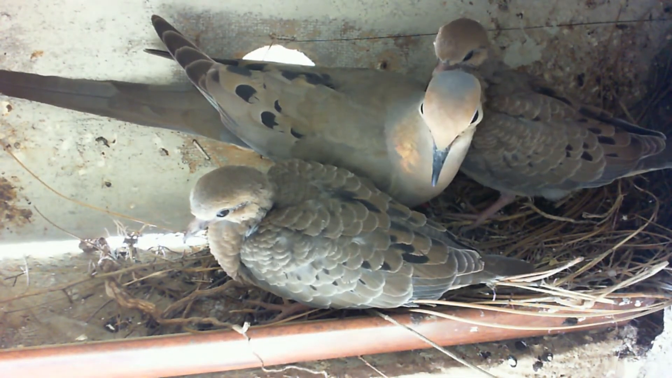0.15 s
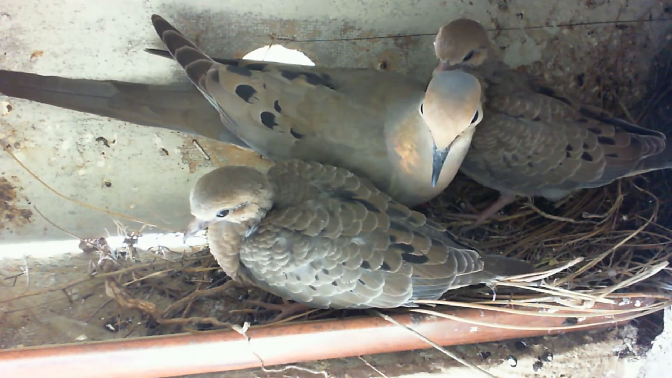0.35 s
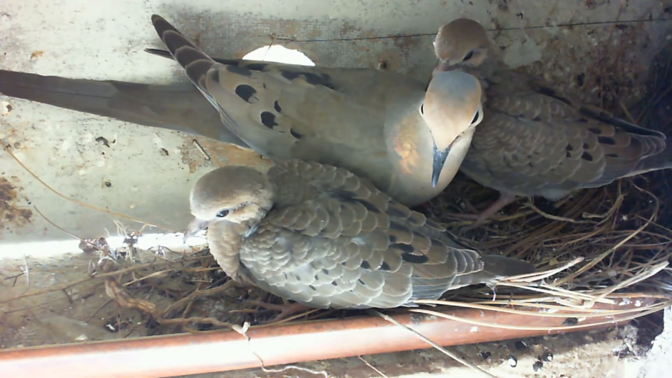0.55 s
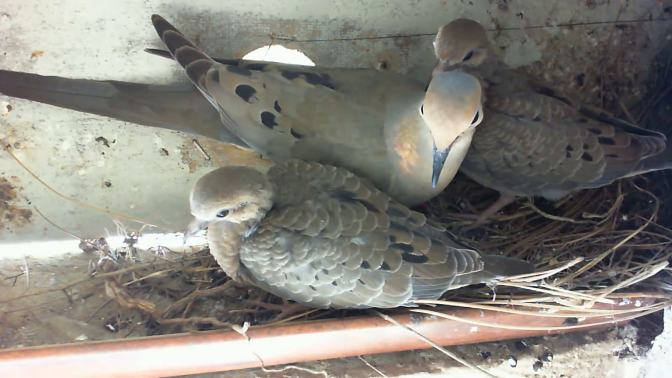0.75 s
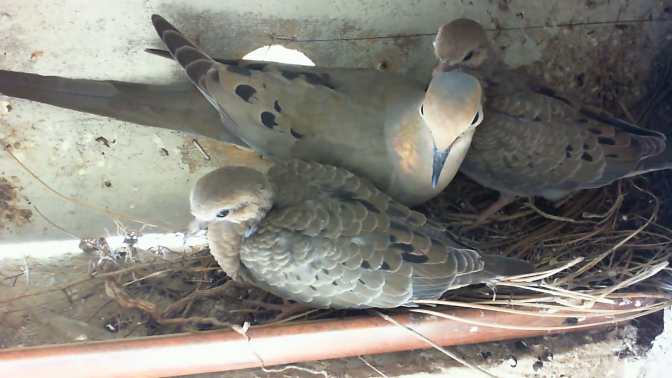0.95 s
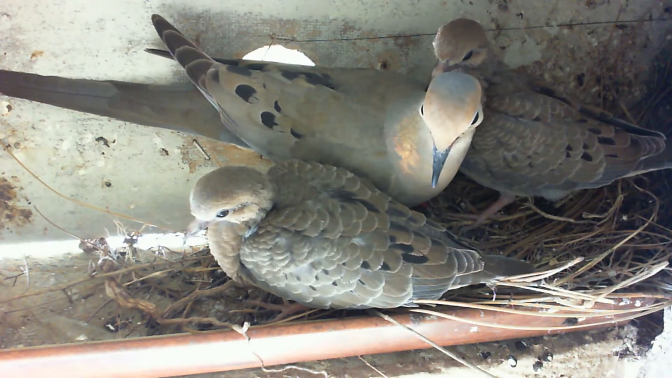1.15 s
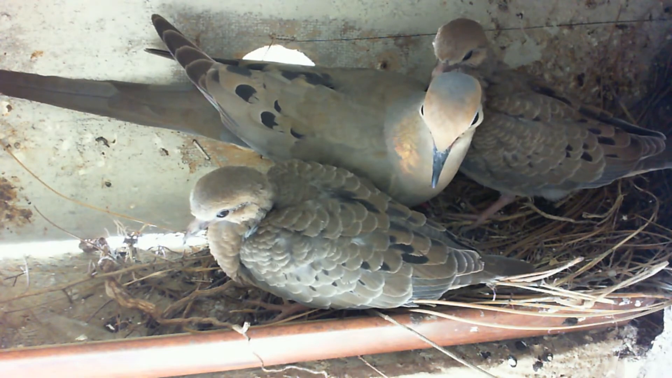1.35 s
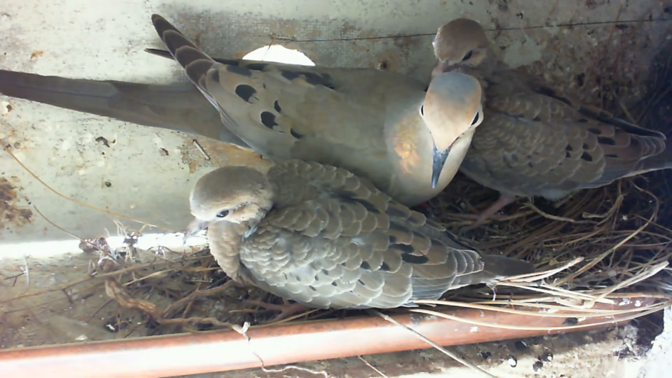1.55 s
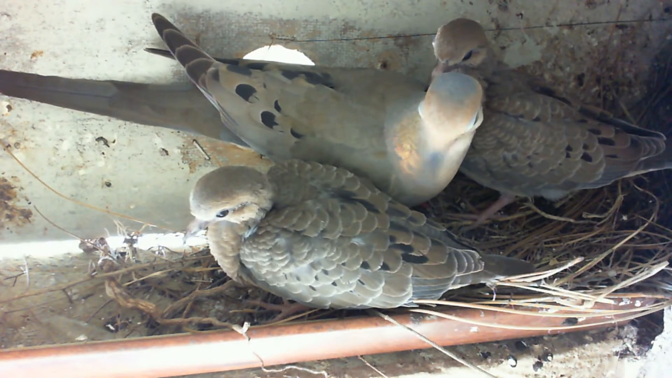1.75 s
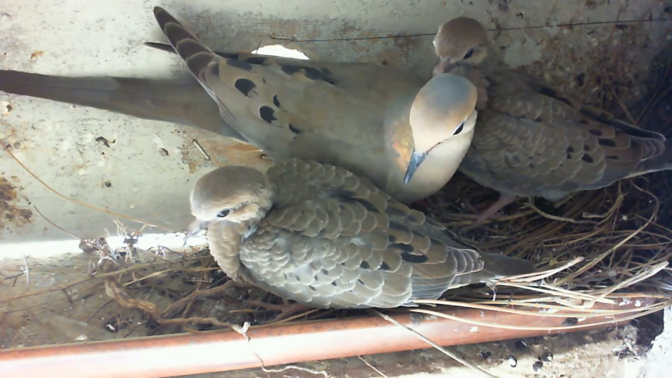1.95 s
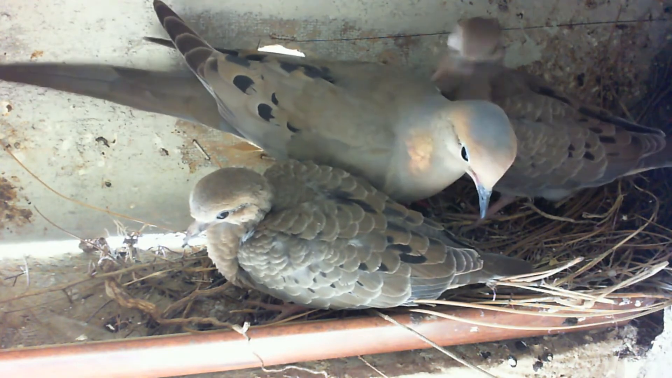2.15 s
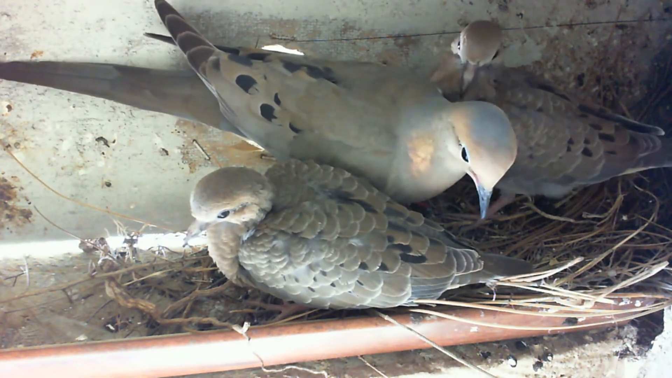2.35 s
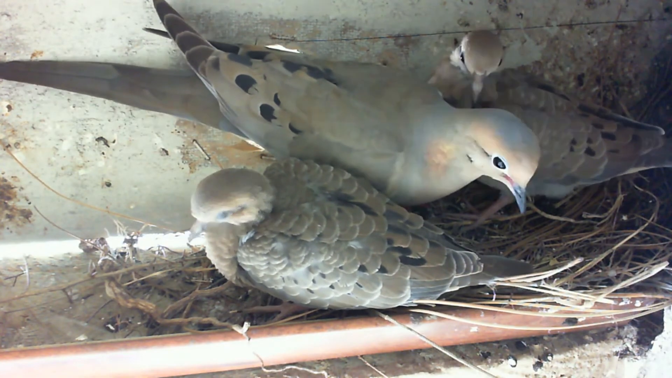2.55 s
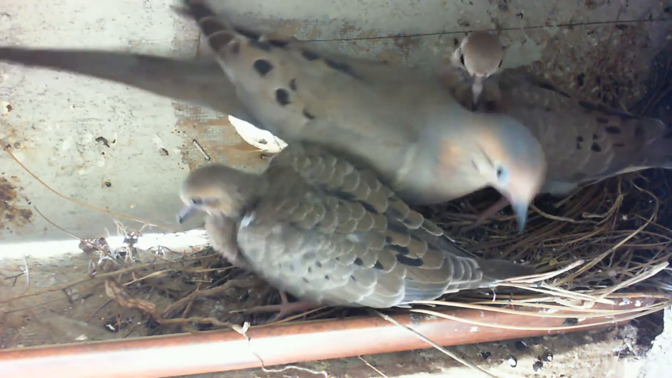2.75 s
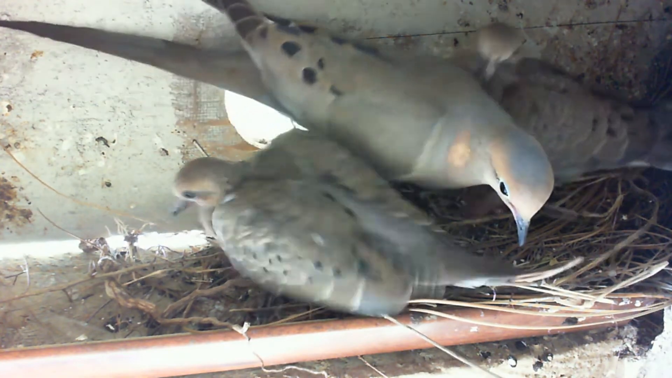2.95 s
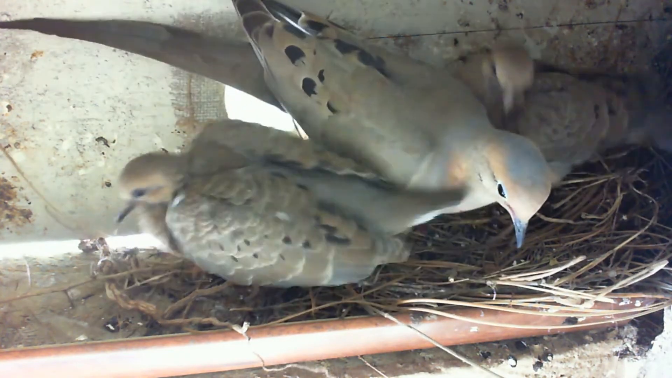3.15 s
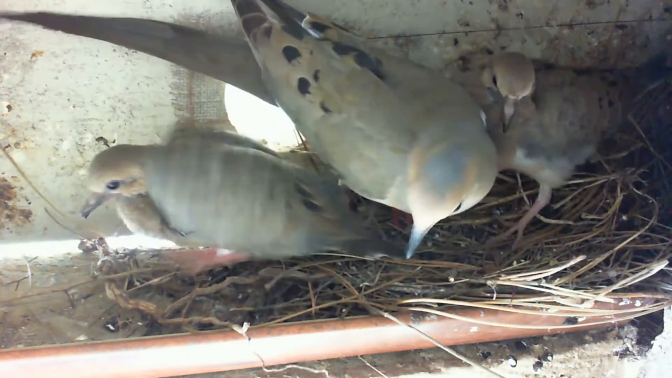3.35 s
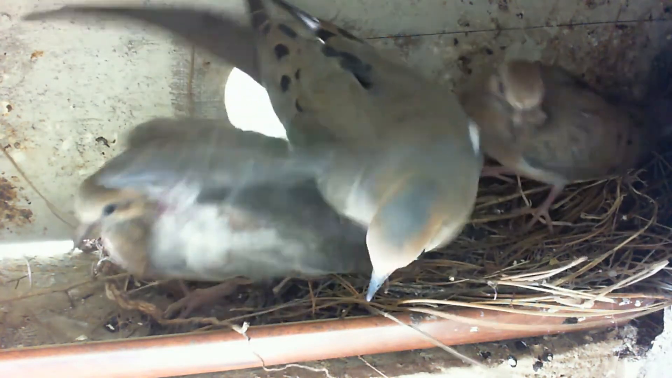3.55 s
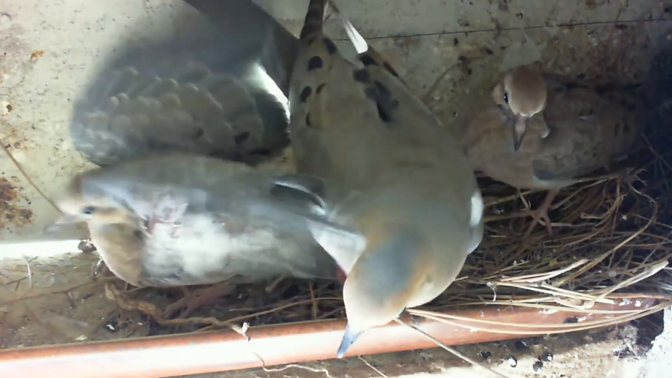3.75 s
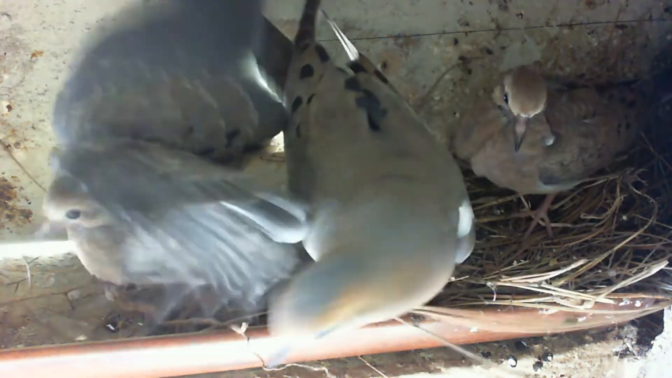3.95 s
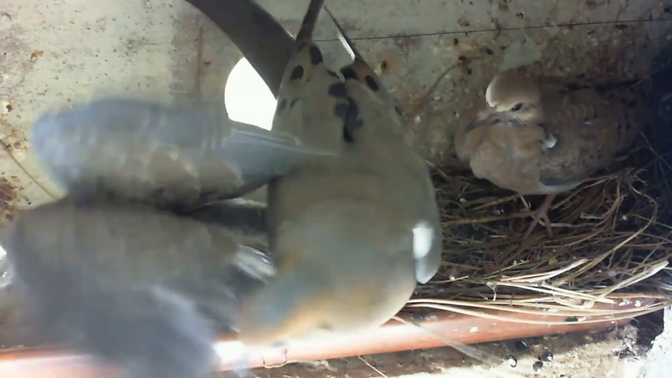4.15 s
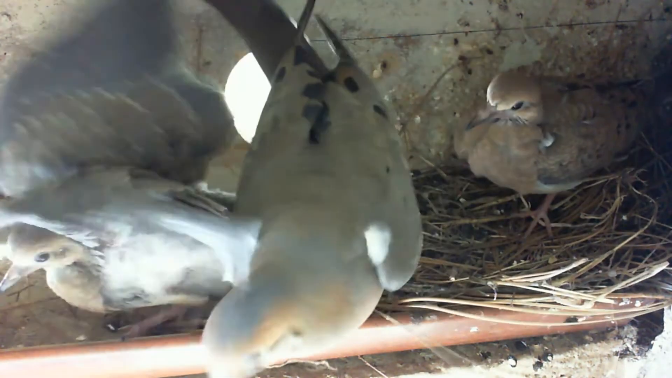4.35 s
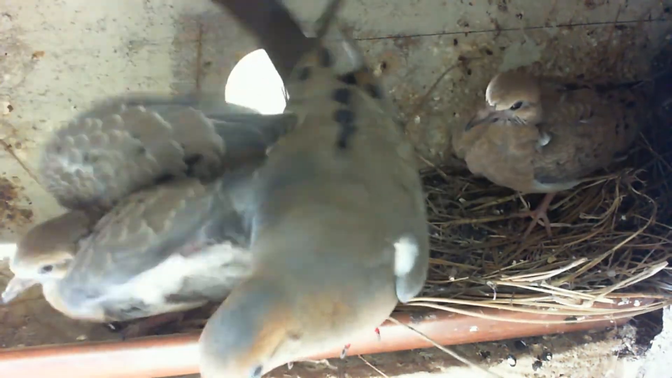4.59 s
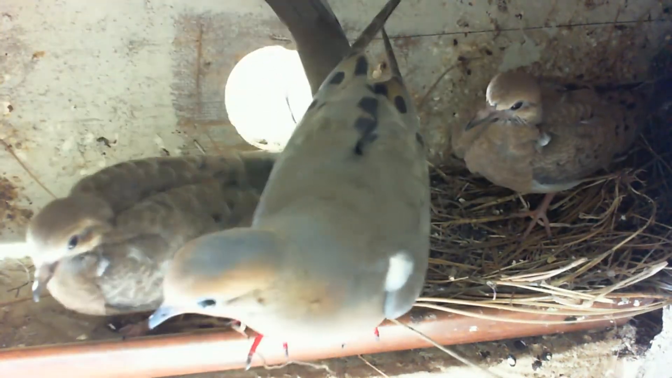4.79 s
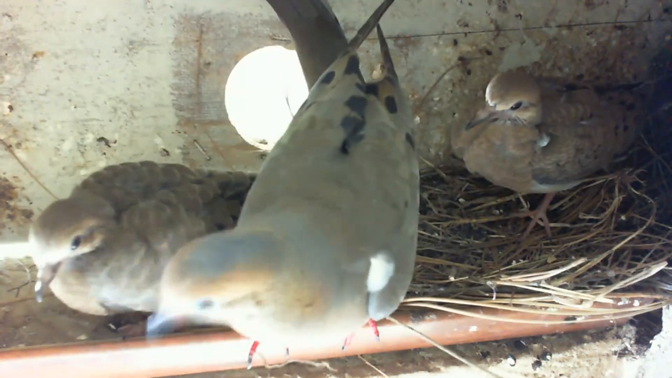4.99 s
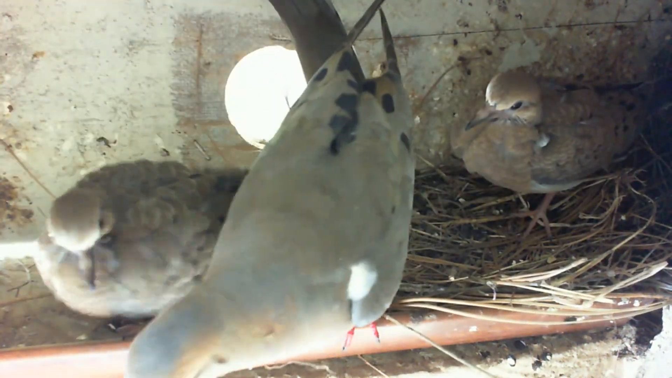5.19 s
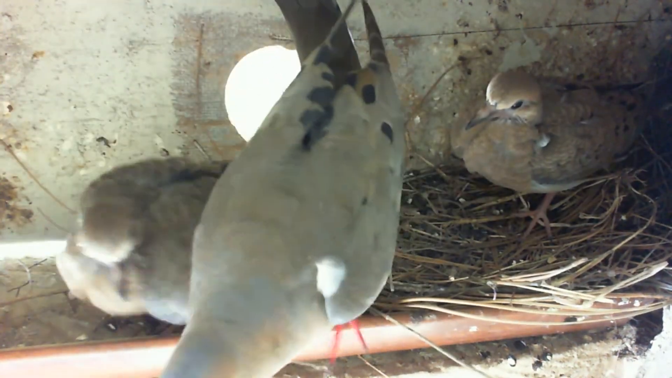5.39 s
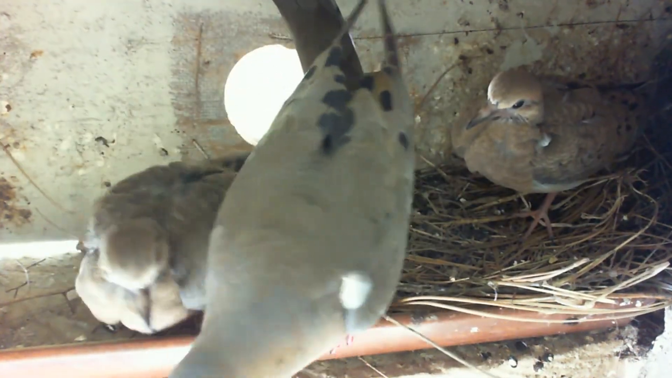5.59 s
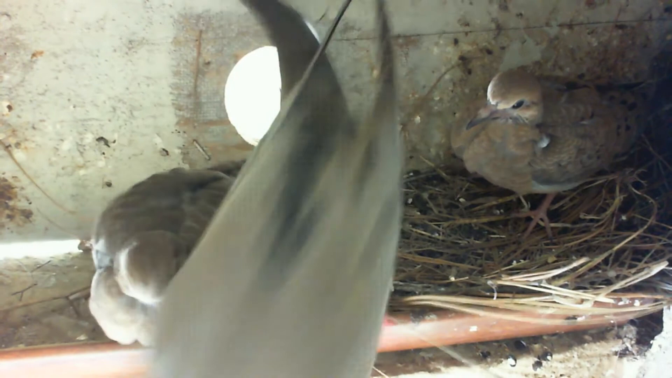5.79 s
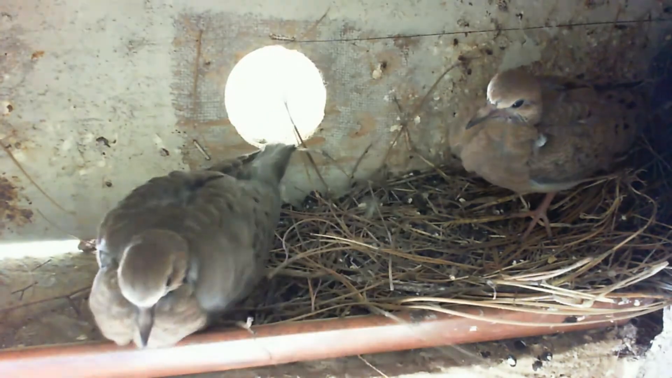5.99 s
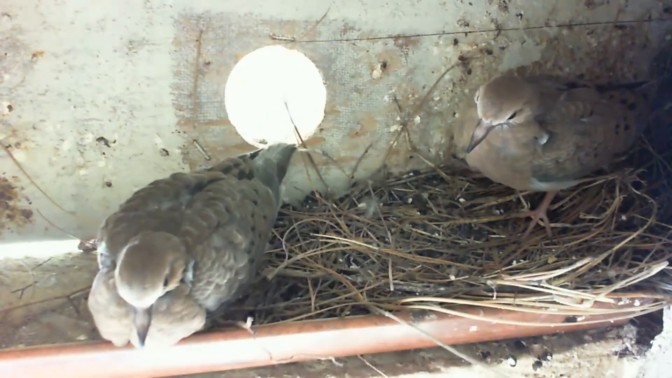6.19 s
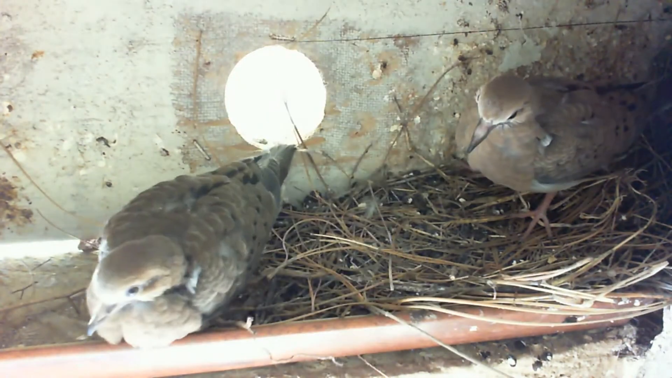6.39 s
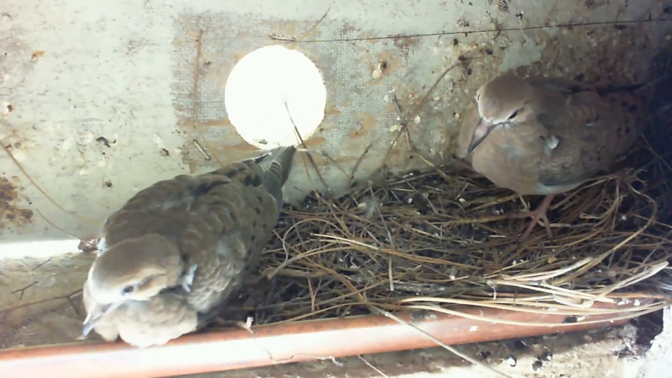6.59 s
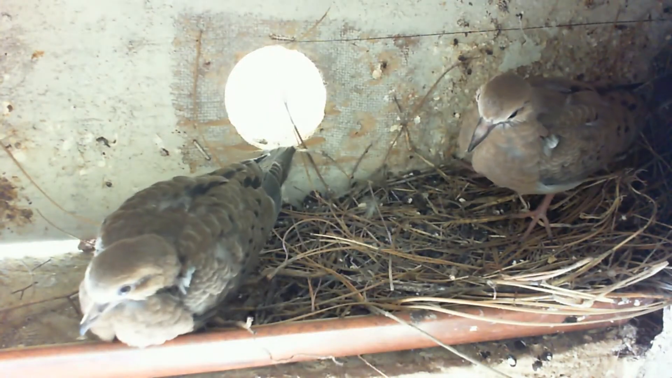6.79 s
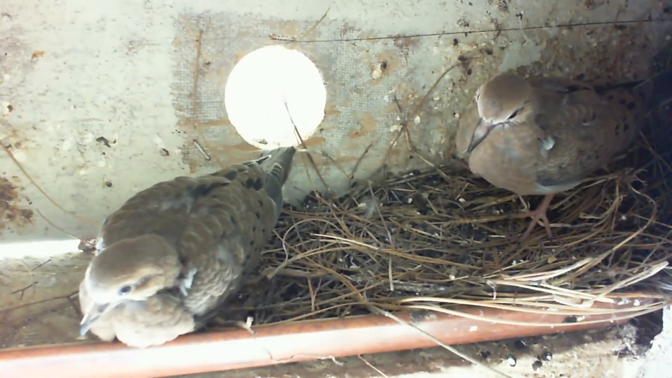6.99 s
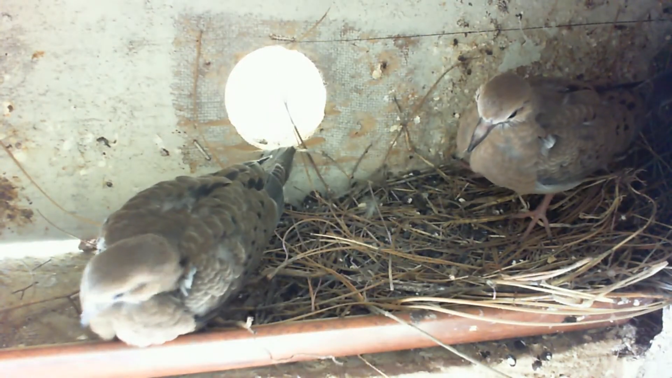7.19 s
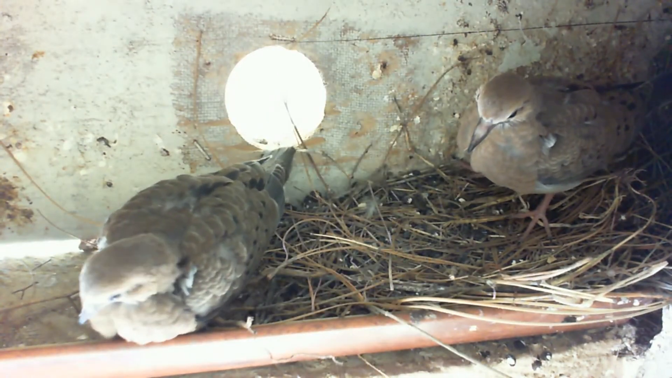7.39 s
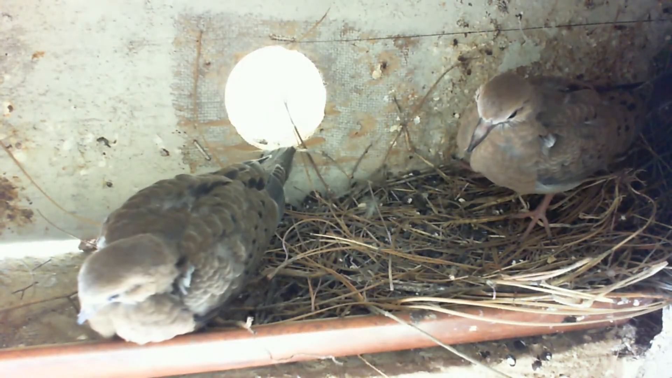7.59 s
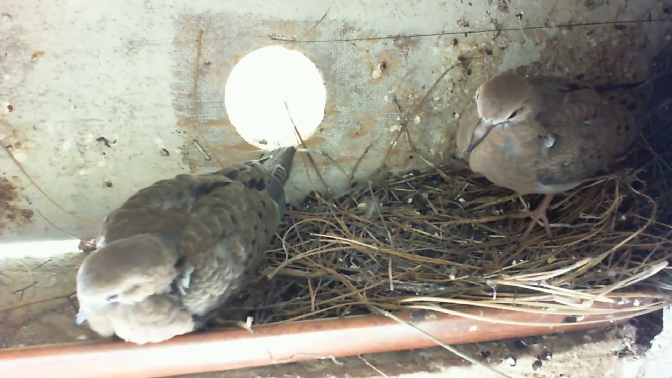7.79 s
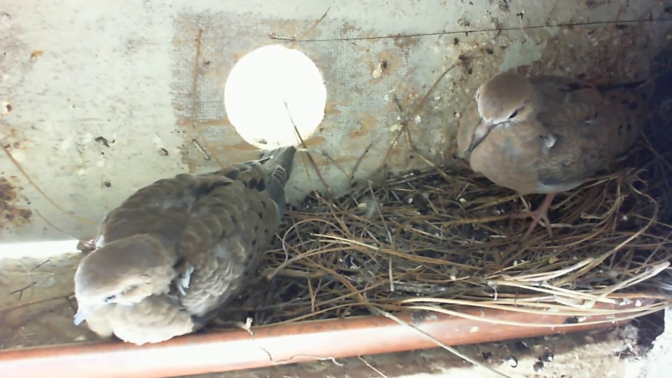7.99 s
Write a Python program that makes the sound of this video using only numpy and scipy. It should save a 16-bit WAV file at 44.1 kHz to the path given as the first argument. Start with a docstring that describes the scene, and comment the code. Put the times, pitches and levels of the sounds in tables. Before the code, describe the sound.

Fledgling doves cheep in thin rising whistles amid gritty rustles and snapping twigs, then the parent bursts away on whistling wingbeats over faint traffic.

```python
"""Far traffic drones throughout as shaped noise and gliding notes, with a thin whine and hiss from the preamp.
A dull tap rings the box and a far songbird chips; then two fledglings cheep in gliding whistles between
gritty rustles on dry twigs, snapping twigs and claw taps. At last the parent dove leaps from the nest box, its
wing feathers whistling on each downstroke as fluttering tones and rushing air that fade away, while the
draught buffets the microphone in low puffs and jolts; the songbird chips once more near the end."""
import sys
import numpy as np
from scipy import signal
from scipy.fft import rfft, irfft, next_fast_len
from scipy.io import wavfile
from scipy.ndimage import uniform_filter1d, map_coordinates

SR = 44100
rng = np.random.default_rng(int(sys.argv[2]) if len(sys.argv) > 2 else 0)


def store_wav(level_fs):
    """Save 16-bit WAV to argv[1]."""
    pcm = np.round(np.clip(np.atleast_2d(level_fs), -1, 1) * 32767)
    wavfile.write(sys.argv[1], SR, pcm.T.astype(np.int16))


N = 354299
TIME = np.arange(N) / SR


def amp(db):
    """Turn decibels into a plain multiplier."""
    return 10 ** (np.asarray(db) / 20)


def unit(x):
    """Scale x to an average strength (rms) of 1."""
    return x / np.sqrt(np.mean(x ** 2) + 1e-20)


def curves(rows):
    """One value per sample for each column after the time."""
    s, *cols = np.transpose(rows)
    return [np.interp(TIME, s, c) for c in cols]


def window(start, length, rise, fall):
    """A straight rise from start to 1, then an exponential fall once length has passed (all in s)."""
    t = TIME - start
    return np.clip(t / rise, 0, 1) * np.exp(-np.clip(t - length, 0, None) / fall)


def wobble(rate):
    """A smooth random curve through rate random points a second."""
    points = rng.standard_normal(int(N * rate / SR) + 4)
    return map_coordinates(points, [TIME * rate])


def filtered(x, response):
    """Multiply the spectrum of x by a response that depends on frequency."""
    m = next_fast_len(len(x) + 8192)
    return irfft(rfft(x, m) * response(np.fft.rfftfreq(m, 1 / SR)), m)[:len(x)]


def coloured(x, points):
    """Shape the spectrum of x by (f/Hz, level/dB) points on a log axis, then set rms to 1."""
    f, db = np.transpose(points)
    return unit(filtered(x, lambda hz: amp(np.interp(np.log(hz + 1), np.log(f + 1), db))))


def resonances(modes):
    """Response of things that ring at (f/Hz, width/Hz, level/dB), with alternating signs."""
    def response(f):
        return sum((-1) ** k * amp(db) * 1j * f * width / (centre ** 2 - f ** 2 + 1j * f * width)
                   for k, (centre, width, db) in enumerate(modes))
    return response


def echoes(x, t60):
    """Spread x into a dying random tail that loses 60 dB in t60 seconds."""
    tail = rng.standard_normal(SR // 2) * amp(-60 * TIME[:SR // 2] / t60)
    return signal.fftconvolve(x, tail / np.linalg.norm(tail))[:N]


def grit(per_s, spread_db, share):
    """Noise with scattered sharp grains in it, rms 1."""
    strength = amp(spread_db * np.minimum(rng.exponential(size=N), 3.5))
    grains = (rng.random(N) < per_s / SR) * strength * rng.standard_normal(N)
    return unit(rng.standard_normal(N) + share * unit(grains))


# Far engine notes, one list each: t/s, f/Hz, level/dB
ENGINE_NOTES = [
    [(0, 128, -58), (1.1, 185, -67.5)],
    [(0, 188, -63.5), (1.4, 192, -59.5), (2.1, 190, -86)],
    [(4.8, 150, -66.5), (8.03, 140, -64)],
    [(4.2, 248, -65.5), (5.5, 246.5, -61.5), (6.6, 243, -76), (7, 241, -54), (8.03, 241, -58.5)],
]


def engine_note(rows):
    """A far engine gives a tone that holds or glides and wavers a little."""
    hz, db = curves(rows)
    start = rows[0][0] - .1
    gate = window(start, rows[-1][0] - start, .1, .1)
    phase = 2 * np.pi * np.cumsum(hz + 3 * wobble(15)) / SR
    return np.sqrt(2) * gate * amp(db + 2.26 * wobble(12)) * np.sin(phase)


# Slow swell of the traffic: t/s, tyre level/dB, engine level/dB
TRAFFIC_SWELL = [(0, -54.5, -57), (.7, -55.5, -55.5), (1.15, -51, -56.5), (1.55, -54, -57),
                 (1.9, -57.5, -57), (4.5, -56, -55), (8.03, -55, -55)]
# Tone colour of tyres and of engines, drone of the hollow box included: f/Hz, relative level/dB per Hz
TYRE_COLOUR = [(180, -19), (345, -51), (402, -2), (556, -4), (762, -3.5), (1110, 0), (1700, -7.5),
               (2200, -19), (4000, -30), (5200, -54)]
ENGINE_COLOUR = [(20, -54), (32, -25), (183, -26.5), (400, -39.5), (880, -120)]


def traffic():
    """Many distant tyres and engines blend into shaped noise that swells slowly, with a few clear notes."""
    tyre_db, engine_db = curves(TRAFFIC_SWELL)
    tyres = amp(tyre_db + 0.62 * wobble(12)) * coloured(rng.standard_normal(N), TYRE_COLOUR)
    engines = amp(engine_db + 0.43 * wobble(2.1)) * coloured(rng.standard_normal(N), ENGINE_COLOUR)
    return tyres + engines + sum(engine_note(rows) for rows in ENGINE_NOTES)


CHEEP_HZ = 3000  # pitch at which the voice levels hold


def whistle(rows, octave_db, waver_hz):
    """A bird's syrinx gives a gliding sine with a fitful octave that thins at high pitch."""
    hz, db = curves(rows)
    phase = 2 * np.pi * np.cumsum(hz + waver_hz * (wobble(70) + 0.6 * wobble(300))) / SR
    gate = window(rows[0][0], rows[-1][0] - rows[0][0], 0.0035, 0.0019)
    octave = amp(octave_db - 10 * np.log2(hz / CHEEP_HZ) + 4.5 * wobble(25)) * np.sin(2 * phase)
    return np.sqrt(2) * gate * amp(db + 1.6 * wobble(40)) * (np.sin(phase) + octave)


# Chips of a songbird further off, one list each: t/s, f/Hz, level/dB
SONGBIRD_CHIPS = [
    [(.905, 3650, -70), (.93, 3680, -72), (.955, 4020, -80)],
    [(1.825, 3750, -76), (1.843, 4080, -70), (1.865, 3730, -79)],
    [(7.55, 4280, -74), (7.575, 3870, -55.5), (7.61, 3800, -61), (7.628, 4560, -68)],
]


def songbird():
    """Far chips trail echoes off walls and trees."""
    chips = sum(whistle(rows, -36, waver_hz=70) for rows in SONGBIRD_CHIPS)
    return chips + amp(-2.5) * echoes(chips, t60=0.31)


def scrape(per_s, spread_db, catch_s, bed):
    """Noise that flares each time a barb catches, then dies away with time constant catch_s, over a bed."""
    strength = amp(spread_db * np.minimum(rng.exponential(size=N), 3))
    catches = (rng.random(N) < per_s / SR) * strength
    flares = signal.fftconvolve(catches, np.exp(-TIME[:SR // 20] / catch_s))[:N]
    return rng.standard_normal(N) * (bed + flares)


def patchy(x, depth_db):
    """Give x bright and dull patches that shift from moment to moment."""
    spectrum = signal.stft(x, nperseg=128)[2]
    field = rng.standard_normal(spectrum.shape)
    field = uniform_filter1d(field, size=5, axis=0)  # smooth over frequency
    field = uniform_filter1d(field, size=9, axis=1)  # smooth over time
    return unit(signal.istft(spectrum * amp(depth_db * unit(field)), nperseg=128)[1][:N])


# Bodies shifting on the twigs: t/s, hiss level/dB
RUSTLE = [(1.7, -78), (2.0, -65), (2.3, -78), (2.6, -70.5), (2.7, -55), (3.45, -57.5), (3.55, -49),
          (3.75, -56.5), (4.5, -59), (4.6, -52.5), (4.76, -57), (4.86, -79), (5.3, -70), (5.6, -67),
          (5.72, -54.5), (5.97, -50.5), (6.198, -51)]
# Feathers dragged over twigs and wall, after one dull tap ringing the box at 0.573 s:
# t/s, length/s, hiss level/dB, box level/dB
TAP_AND_DRAGS = [(0.573, .008, -82, -49.5), (1.975, 0.034, -57, -81), (2.102, 0.048, -56, -75),
                 (2.937, 0.023, -46, -56), (2.968, .015, -51.5, -56), (3.008, 0.041, -48, -61),
                 (3.138, 0.023, -53.5, -55), (3.518, 0.067, -45.5, -56.5), (3.591, 0.034, -45.5, -52),
                 (3.778, 0.012, -46, -60), (3.801, 0.059, -40.5, -49.5), (3.903, 0.031, -39, -49),
                 (3.96, 0.011, -56, -46.5), (4.002, 0.035, -35, -47), (4.3, 0.048, -39.5, -47),
                 (5.306, 0.027, -60.5, -48.5), (5.782, 0.064, -46.5, -52), (5.86, 0.0062, -40, -48),
                 (5.976, 0.014, -35, -35), (6.051, 0.028, -60, -38.5), (6.178, 0.061, -51.5, -50.5)]
# Twigs snapping: t/s, level/dB
TWIG_SNAPS = [(1.939, -41), (2.487, -47), (2.883, -36), (3.084, -48), (3.601, -37), (3.8953, -32),
              (4.03, -29), (4.042, -34), (4.334, -21.5), (4.817, -43.5), (5.7017, -35)]
# Tone colour of feather hiss and twig cracks: f/Hz, relative level/dB per Hz
FEATHER_COLOUR = [(1500, -13), (3500, -12), (4700, -6.5), (7500, 0.5), (9800, 2.5), (11500, -2.5),
                  (15200, -8)]
# Resonances of the air in the box: f/Hz, width/Hz, relative level/dB
BOX_AIR = [(500, 71, -0.5), (848, 94, -7.5), (1116, 38, 5.5), (1620, 570, -12.5)]


def nest():
    """A tap rings the air in the box; feathers rub on twigs as gritty hiss and stir that air; twigs snap."""
    hiss_level = amp(curves(RUSTLE)[0] + 1.8 * wobble(30)) * window(0, RUSTLE[-1][0], 1, .04)
    box_level = np.zeros(N)
    for start, length, hiss_db, box_db in TAP_AND_DRAGS:
        contact = window(start, length, .25 * length, .007)
        hiss_level = np.hypot(hiss_level, amp(hiss_db) * contact)
        box_level = np.hypot(box_level, amp(box_db) * contact)
    barbs = scrape(220, 4.5, .0007, bed=1.3) * amp(2 * wobble(120))
    hiss = hiss_level * patchy(coloured(barbs, FEATHER_COLOUR), depth_db=2.5)
    # noise peaks stand above its rms, hence the 7 dB cut
    snap_level = sum(amp(db - 7) * window(s, 0.00061, 0.00029, 0.0026) for s, db in TWIG_SNAPS)
    snaps = snap_level * coloured(np.sign(rng.standard_normal(N)), FEATHER_COLOUR)
    box = box_level * unit(filtered(grit(340, 0.57, 0.88), resonances(BOX_AIR)))
    return hiss + snaps + box


# Claws tapping the rim: t/s, level/dB (scales the whole tap), low ring level/dB
CLAW_TAPS = [(3.935, -41, -10), (4.496, -41, 0), (4.56, -38.5, -9), (5.805, -49, 11), (5.863, -54.5, 18.5),
             (6.186, -40, -30), (6.993, -38, -24)]
# Ringing tones of the rim: f/Hz, relative level/dB, time to fall 60 dB/s
RIM_TONES = [(960, 10, 0.011), (1940, -2, 0.031), (778, -5, 0.041), (1420, 8.5, 0.01)]
# Low ring of the rim: f/Hz, time to fall 60 dB/s
RIM_LOW = (465, 0.1)


def knocks():
    """Each claw tap sets the rim ringing, its upper tones at new strengths."""
    out, t = np.zeros(N + SR), TIME[:SR // 2]
    low_hz, low_t60 = RIM_LOW
    for start, tap_db, low_db in CLAW_TAPS:
        ring = sum(amp(level + rng.normal(0, 2) - 60 * t / t60) * np.sin(2 * np.pi * hz * t)
                   for hz, level, t60 in RIM_TONES)
        low = amp(low_db - 60 * t / low_t60) * np.sin(2 * np.pi * low_hz * t)
        soft_start = 1 - np.exp(-t / .0006)
        out[round(start * SR):][:len(t)] += amp(tap_db) * (ring + low) * soft_start
    return out[:N]


START_DB, END_DB = -2, -5  # added to the two ends of a cheep
PAST_PEAK_DB = -11  # the voice gives way after its top note


def cheep(level_db, swell_db, octave_db, pitch):
    """Level changes with pitch, by each voice's own swell; some grow fainter as they rise."""
    s, hz = np.transpose(pitch)
    db = level_db + swell_db * np.log2(hz / CHEEP_HZ)
    db[np.argmax(hz) + 1:] += PAST_PEAK_DB
    db[[0, -1]] += [START_DB, END_DB]
    return whistle(np.transpose([s, hz, db]), octave_db, waver_hz=26)


# Fledgling voices, some in pairs from one throat:
# level/dB at 3000 Hz, swell/dB per octave of pitch, octave level/dB at 3000 Hz, pitch curve of (t/s, f/Hz)
FLEDGLING_CHEEPS = [ (-66, 28, -14, [(2.19, 2130), (2.43, 2610), (2.5, 3040), (2.545, 3090), (2.58, 3320),
                    (2.8, 3730), (2.828, 3200)]), (-73, -13, -21, [(2.2, 2210), (2.28, 2360), (2.42, 2880),
                    (2.5, 3760), (2.63, 4470)]), (-57, 13, -10, [(2.562, 2050), (2.6, 2515), (2.73, 2640),
                    (2.83, 3060), (2.895, 3250), (2.912, 3460), (2.93, 3470), (2.94, 3200), (2.98, 3000)]),
                    (-62.5, -1, -17.5, [(3.382, 1675), (3.4, 2200), (3.47, 2660), (3.52, 2520),
                    (3.695, 2780), (3.708, 2540)]), (-67.5, 5, -20, [(3.39, 2090), (3.42, 2650),
                    (3.47, 2750), (3.5, 2770), (3.69, 3350), (3.708, 3070)]), (-56, 27, -7.5, [(4.57, 1780),
                    (4.635, 2230), (4.77, 2410), (4.835, 2960), (4.865, 2500)]),
                    (-58, -2, -12.5, [(5.375, 2114), (5.408, 2680), (5.425, 2600), (5.44, 2740),
                    (5.465, 2550), (5.53, 3150), (5.595, 3040), (5.63, 3830), (5.675, 3760),
                    (5.694, 3110)]), (-68, 33, -8, [(5.56, 3306), (5.6, 3300), (5.63, 3950), (5.68, 4040),
                    (5.69, 3870)]), ]


def fledglings():
    """Young voices close to the microphone, without echo."""
    return sum(cheep(*voice) for voice in FLEDGLING_CHEEPS)


def eddies(points, smooth_s):
    """Low turbulent pressure; its chance swells are evened out over smooth_s seconds."""
    x = coloured(rng.standard_normal(N), points)
    size = int(smooth_s * SR)
    power = uniform_filter1d(uniform_filter1d(x * x, size), size)
    return unit(x / np.sqrt(np.abs(power) + 0.039))


# Tone colour of the slow heave and of the faster rumble: f/Hz, relative level/dB per Hz
HEAVE_COLOUR = [(12, 2.5), (30, 0.5), (55, -7), (100, -29), (400, -120)]
RUMBLE_COLOUR = [(40, -8.5), (80, 3.5), (150, -13.5), (500, -43.5), (1500, -120)]
# Puffs of wing draught on the microphone: t/s, length/s, heave level/dB
PUFFS = [(3.992, 0.056, -41), (5.991, 0.024, -21), (6.055, 0.019, -29), (6.403, 0.047, -10.5),
         (6.478, 0.033, -14.5), (6.554, 0.031, -18.5), (6.663, 0.12, -26), (7.153, 0.049, -42)]
# Stirred air between puffs: t/s, heave level/dB
WAKE = [(5.95, -38), (6.19, -39.5), (6.36, -28.5), (6.84, -33), (7.3, -36.5), (7.551, -49.5)]
# Tight vortices hitting the microphone: t/s, peak level/dB, f/Hz
JOLTS = [(6.055, -34, 110), (6.421, -12, 117), (6.484, -17, 193), (6.563, -25.5, 147)]
PUFF_RISE_S, PUFF_FALL_S = 0.012, 0.017
RUMBLE_DB, RUMBLE_GROWS = -8, 1.31  # faster eddies grow more steeply: dB per dB of heave
JOLT_CYCLES = 0.75  # half-width of a jolt, in cycles of its own frequency


def draught():
    """Air pushed by the wings washes over the microphone in puffs and jolts, over a lingering wake."""
    heave, rumble = eddies(HEAVE_COLOUR, 0.028), eddies(RUMBLE_COLOUR, 0.011)
    heave_level = amp(curves(WAKE)[0]) * window(WAKE[0][0], WAKE[-1][0] - WAKE[0][0], 0.025, 0.064)
    rumble_level = np.zeros(N)
    for start, length, heave_db in PUFFS:
        rise = np.clip(TIME - start, None, 0) / PUFF_RISE_S
        fall = np.clip(TIME - start - length, 0, None) / PUFF_FALL_S
        puff = np.exp(rise - fall)
        heave_level = np.hypot(heave_level, amp(heave_db) * puff)
        rumble_level = np.hypot(rumble_level, amp(RUMBLE_DB + RUMBLE_GROWS * heave_db) * puff)
    jolts = np.zeros(N)
    for centre, peak_db, hz in JOLTS:
        cycles = (TIME - centre) * hz
        jolts += amp(peak_db) * np.exp(-(cycles / JOLT_CYCLES) ** 2) * np.cos(2 * np.pi * cycles)
    return heave_level * heave + rumble_level * rumble * amp(1.5 * wobble(45)) + jolts


# Downstrokes of the parent, fading as it flies off: t/s, level/dB, basic flutter f/Hz
DOWNSTROKES = [(5.993, -28, 1850), (6.069, -34.5, 1897), (6.151, -39, 1915), (6.242, -40, 1947),
               (6.331, -41.5, 1972), (6.42, -43.5, 1835), (6.52, -44.5, 1884), (6.619, -45.5, 1850),
               (6.724, -47.5, 1867), (6.834, -49.5, 1825), (6.957, -54.5, 1830), (7.078, -56.5, 1822),
               (7.208, -60.5, 1835), (7.349, -60.5, 1820)]
# Harmonics of a fluttering feather, from the first up: relative level/dB
FLUTTER_HARMONICS = [9, -6, -2.5, -3.5, -9, -14.5]
# Strokes whose feathers flutter nearly in step: row number, counted from 0
IN_STEP = [0, 3]
CLOSE_SPREAD, FANNED_SPREAD = .03, .08  # how far apart the feather rates lie, in step and on other strokes
IN_BOX_STROKES = 3  # the first strokes are made inside the box
CRAMPED_S, STROKE_S = 0.011, .045  # length of a stroke before its fall, in the box and outside
SCOOP, SCOOP_S, SAG_PER_S = 0.076, .008, 0.95  # flutter starts low, speeds up, then slows late in the stroke
RUSH_IN_DB, RUSH_OUT_DB, RUSH_FADE_DB_PER_S = -4, -5, 2.5  # air rush over the whistle, in the box and outside
BOOM_DB = 8.5  # strokes inside the box ring one of its air modes


def wingbeats(count=5):
    """On each downstroke several primaries flutter at different, unsteady rates, and air rushes through."""
    s, stroke_db, hz = np.transpose(DOWNSTROKES)
    leave = s[IN_BOX_STROKES]
    length = np.where(s < leave, CRAMPED_S, STROKE_S)
    level = amp(stroke_db) @ [window(start, span, 0.0027, 0.024) for start, span in zip(s, length)]

    beat = np.searchsorted(s[1:] - .01, TIME)  # which stroke each sample belongs to
    age = np.clip(TIME - s[beat], 0, .08)
    sag = 1 - SCOOP * np.exp(-age / SCOOP_S) - SAG_PER_S * age
    spread = np.where(np.isin(beat, IN_STEP), CLOSE_SPREAD, FANNED_SPREAD)
    flutter = np.zeros(N)
    for place in np.linspace(-1, 1, count):  # one feather at a time
        chance = rng.standard_normal((len(s), 2))[beat]  # new rate and strength on each stroke
        detune = 1 + spread * (place + .2 * chance[:, 0]) + .02 * wobble(90) + .022 * wobble(500)
        phase = 2 * np.pi * np.cumsum(hz[beat] * sag * detune) / SR
        feather = sum(amp(db + 5.8 * wobble(200)) * np.sin((k + 1) * phase)
                      for k, db in enumerate(FLUTTER_HARMONICS))
        flutter += amp(1.6 * chance[:, 1]) * feather

    rush = coloured(grit(600, 3.3, 0.4), [(300, -7), (1100, 0), (1700, 9), (2200, -7.5),
                                          (2800, -21), (4000, -10), (15000, -22)])
    in_box = TIME < leave
    rush_db = np.where(in_box, RUSH_IN_DB, RUSH_OUT_DB - RUSH_FADE_DB_PER_S * (TIME - leave))
    wings = level * (unit(flutter) + amp(rush_db) * rush)
    wings = wings + amp(BOOM_DB) * filtered(wings * in_box, resonances(BOX_AIR[2:3]))
    return wings + amp(-14) * echoes(wings, t60=0.5)  # walls nearby fill the gaps


def scene():
    """All the sounds around the nest box, added together."""
    background = traffic() + songbird()
    box = nest() + knocks() + fledglings()
    return (background + box + draught() + wingbeats())[None]


# Tone colour of the preamp hiss: f/Hz, relative level/dB per Hz
HISS_COLOUR = [(1500, -54), (3000, -8), (5000, -5.5), (9000, -11.5), (15800, -13.5)]
HISS_DB, WHINE_DB, WHINE_HZ = -71.5, -84.5, 13170  # the whine is thin and electronic
OFFSET, TOP_HZ = -.022, 15830  # constant shift of the signal; nothing else passes from TOP_HZ up


def record(dry):
    """Add preamp hiss and a whine of narrow noise, cut the top of the band, then add a DC offset."""
    hiss = amp(HISS_DB) * coloured(rng.standard_normal(N), HISS_COLOUR)
    whine = amp(WHINE_DB) * unit(filtered(rng.standard_normal(N), resonances([(WHINE_HZ, 60, 0)])))
    return filtered(dry[0] + hiss + whine, lambda hz: hz < TOP_HZ)[None] + OFFSET


dry = scene()
out = record(dry)
store_wav(out)
```